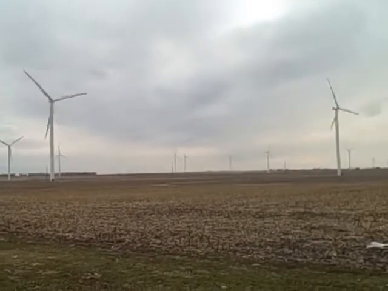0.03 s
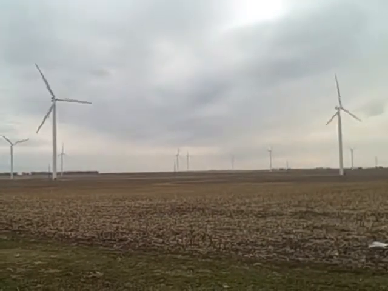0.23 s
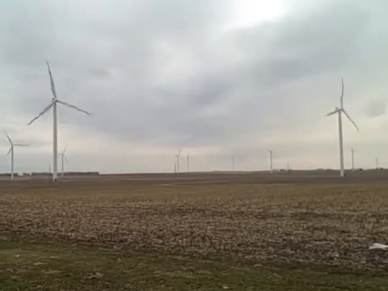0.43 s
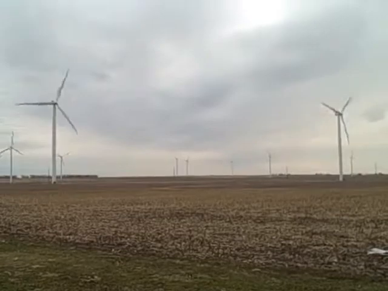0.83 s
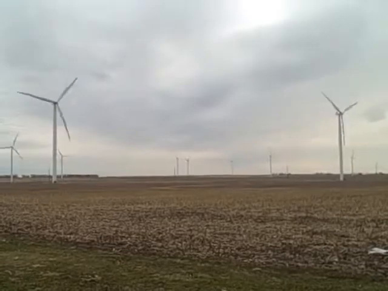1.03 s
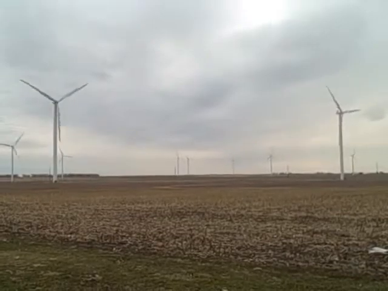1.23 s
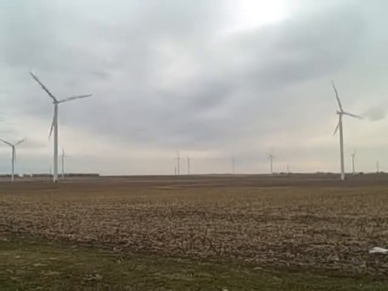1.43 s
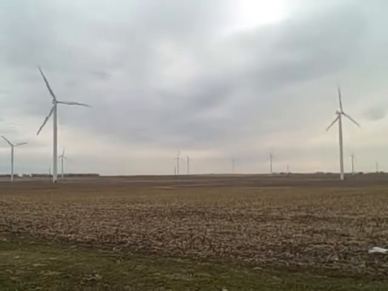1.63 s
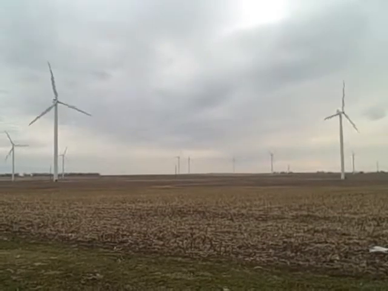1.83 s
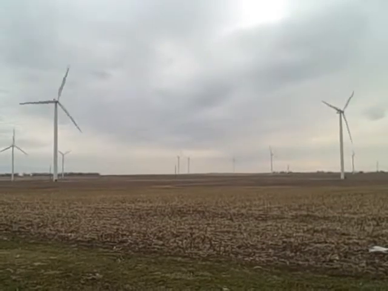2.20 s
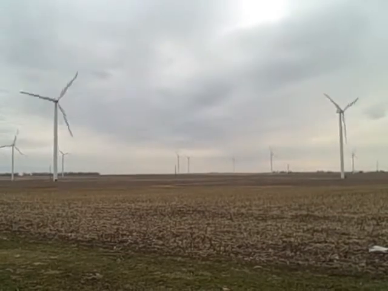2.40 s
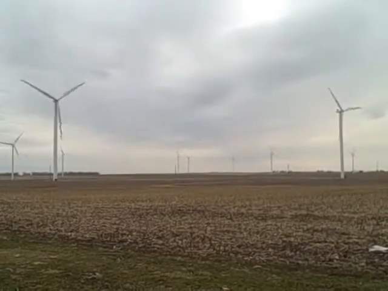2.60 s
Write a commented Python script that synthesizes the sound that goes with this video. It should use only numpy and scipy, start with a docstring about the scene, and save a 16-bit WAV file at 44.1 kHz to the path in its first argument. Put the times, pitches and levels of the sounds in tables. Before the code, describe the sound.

Gusty wind hits the microphone outdoors near wind turbines, thumping and rasping hard at first. It then settles into a quieter low rumble with light thumps, a faint far rush and a weak machine hum behind it.

```python
"""An open field with wind turbines, where gusty wind blows on a small microphone.
Eddies (little swirls of air) hit the microphone's opening as short low thumps. The hardest
break into a fluttering rasp, and a faint whistle from an edge rides the main gust.
The wind then settles to a low rumble over the far rush of the field and a weak machine hum."""
import sys
import numpy as np
from scipy import signal
from scipy.fft import rfft, irfft, next_fast_len
from scipy.io import wavfile
from scipy.ndimage import uniform_filter1d

SR = 44100
rng = np.random.default_rng(int(sys.argv[2]) if len(sys.argv) > 2 else 0)


def digitize_waveform(pressure):
    """Quantize a signal to 16-bit integers and store it at the path in sys.argv[1].

    Rows of a 2-D input are taken as channels; values are limited to [-1, 1].
    """
    field = np.atleast_2d(pressure).T
    bounded = np.clip(field, -1, 1)
    quanta = np.round(bounded * 32767).astype(np.int16)
    wavfile.write(sys.argv[1], SR, quanta)


N = 121275

# How hard the wind presses between hits. Each row: time in seconds, rumble level in dB.
WIND_PRESSURE = [(0, -34), (.05, -39.5), (.17, -39.5), (.28, -28.5), (.45, -30.5), (.62, -30.5),
                 (.8, -28.5), (.87, -30), (1.06, -43.5), (1.17, -38), (1.35, -39), (1.58, -44.5),
                 (1.72, -39.5), (1.82, -39), (1.88, -42.5), (2.1, -41), (2.2, -39.5), (2.36, -50),
                 (2.5, -46), (2.75, -49)]
# Eddies that hit the opening. Each row: time of the peak in seconds, length in seconds,
# then the strengths of its thump, its rasp and its puff in dB.
EDDY_HITS = [(0.093, 0.026, -30.5, -82, -80), (0.206, 0.017, -23.5, -43, -54.5),
             (0.244, 0.016, -26, -37.5, -68), (0.276, 0.021, -17, -37.5, -64.5),
             (0.292, 0.015, -13.5, -27, -43), (0.305, 0.012, -18, -26.5, -39.5),
             (0.321, 0.0094, -18.5, -26, -55), (0.347, 0.014, -10, -33.5, -41),
             (0.356, 0.014, -8, -15.5, -31), (0.374, 0.014, -12, -25, -36), (0.408, 0.03, -15, -35, -58),
             (0.412, 0.0078, -11.5, -45.5, -51.5), (0.473, 0.038, -21.5, -44, -68.5),
             (0.528, 0.024, -19, -40, -55), (0.573, 0.021, -17, -35, -54),
             (0.649, 0.013, -10.5, -31, -44.5), (0.717, 0.026, -22, -31.5, -52),
             (0.74, 0.013, -20, -24, -41), (0.754, 0.018, -15.5, -37, -50),
             (0.787, 0.0087, -18.5, -40.5, -57), (0.816, 0.016, -12.5, -29.5, -58.5),
             (0.894, 0.013, -19.5, -32, -51), (0.914, 0.014, -27.5, -40.5, -50),
             (0.983, 0.028, -21, -48.5, -64), (1.022, 0.019, -23.5, -58.5, -73),
             (1.074, 0.021, -27.5, -52.5, -74), (1.097, 0.018, -24, -52.5, -51.5),
             (1.114, 0.02, -30, -46.5, -58), (1.242, 0.03, -28.5, -56.5, -75),
             (1.26, 0.012, -48, -62, -52.5), (1.955, 0.019, -27, -66, -52.5),
             (1.974, 0.014, -26, -52.5, -52), (2.025, 0.02, -27, -57.5, -84),
             (2.046, 0.0071, -25, -50, -72), (2.073, 0.022, -23, -52, -64), (2.089, 0.019, -30, -54, -52),
             (2.116, 0.038, -29, -51.5, -74), (2.44, 0.031, -22.5, -65.5, -75),
             (2.471, 0.036, -25, -50.5, -74), (2.497, 0.009, -35, -54, -54),
             (2.512, 0.011, -27.5, -44.5, -49), (2.529, 0.016, -26.5, -52.5, -67.5),
             (2.554, 0.037, -30, -52, -66), (2.609, 0.015, -33, -79, -79.5)]
# The tone colours of four noises. Each row: frequency in Hz, relative strength there in dB.
RUMBLE_COLOUR = [(10, -13.5), (22, 1), (45, 2), (75, -10), (130, -13), (200, -24), (320, -34), (600, -51.5),
                 (1500, -74)]
RUSH_COLOUR = [(40, 14), (200, -4.5), (400, -2), (800, 0.5), (1200, -0.5), (1700, -5.5), (2400, -19),
               (3300, -26), (4400, -31), (5400, -28.5), (6200, -35), (7300, -42), (8500, -57)]
THUMP_COLOUR = [(12, -21.5), (28, -4), (55, 1.5), (110, -0.5), (170, -7), (245, -13.5), (330, -28),
                (600, -51.5), (1500, -91.5)]
RASP_COLOUR = [(100, -17.5), (230, 6), (335, -0.5), (450, 1.5), (630, -0.5), (850, -14), (1250, -37),
               (1800, -42), (2600, -49.5), (5000, -63)]
# The far rush of the field. Each row: time in seconds, level in dB before the treble boost.
RUSH_LEVEL = [(0, -64.5), (.15, -58.5), (.6, -55), (1.1, -57.5), (1.5, -55.5), (2.0, -54), (2.4, -53.5),
              (2.75, -55)]
# The treble heard in the background. Each row: time in seconds, boost in dB (below zero is a cut).
BACKGROUND_TREBLE = [(0, 15), (.2, 3.5), (.45, -2), (.95, 1), (1.15, 4), (2.75, 2)]
# Air whistling at an edge. Each row: time in seconds, pitch in Hz, level in dB.
EDGE_WHISTLE = [(.38, 1667, -105), (.53, 1645, -65.5), (.66, 1720, -62.5), (.77, 1770, -62),
                (.88, 1798, -63.5), (1.0, 1766, -77.5), (1.15, 1776, -105)]


def undb(db):
    """Turn decibels into a number to multiply by."""
    return 10 ** (np.asarray(db) / 20)


def unit(x):
    """Scale a signal so its average size (rms) is 1."""
    return x / np.sqrt(np.mean(x ** 2))


def curve(table, column=1):
    """One column of a table, joined by straight lines in time."""
    rows = np.array(table)
    return np.interp(np.arange(N) / SR, rows[:, 0], rows[:, column])


def noise(gain):
    """Noise of size 1, with its frequencies weighted by gain(Hz)."""
    size = next_fast_len(N)
    hz = np.maximum(np.arange(size // 2 + 1) * SR / size, 1)
    spectrum = rfft(rng.standard_normal(size)) * gain(hz)
    return unit(irfft(spectrum, size)[:N])


def coloured(colour):
    """Noise that follows a colour table and falls away above its last row."""
    hz, db = np.array(colour).T
    return noise(lambda f: undb(np.interp(np.log(f), np.log(hz), db)) / np.maximum(f / hz[-1], 1) ** 2)


def band(centre_hz, width_hz):
    """Noise around one frequency. Centred on 0, it is a random wobble."""
    return noise(lambda f: 1 / (1 + ((f - centre_hz) / width_hz) ** 2) ** 2)


def eddies(colour, window_s=0.019, evenness=0.66):
    """Random swings of air pressure, evened out so each thump and rasp has a reliable strength."""
    swings = coloured(colour)
    power = uniform_filter1d(np.abs(signal.hilbert(swings)) ** 2, int(window_s * SR))
    return unit(swings / (power + 1e-9) ** (evenness / 2))


def hit_powers(wind_db):
    """Each eddy that hits gives a brief swell of power to the thump, the rasp and the puff."""
    t = np.arange(N) / SR
    thump, puff = np.zeros(N), np.zeros(N)
    strong_wind_db = -31.5
    rasp = undb(-50.5 + 3.1 * (wind_db - strong_wind_db)) ** 2  # strong wind rasps between hits too
    for peak_s, length_s, thump_db, rasp_db, puff_db in EDDY_HITS:
        swell = np.exp(-(2 * (t - peak_s) / length_s) ** 2)
        thump += swell * undb(thump_db) ** 2
        rasp += swell * undb(rasp_db) ** 2
        puff += swell * undb(puff_db) ** 2
    return thump, rasp, puff


def wind_rumble(wind_db, wander_db=1.5):
    """Wind pressing on the microphone makes a low rumble that swells and sags by chance."""
    return undb(wind_db + wander_db * band(0, width_hz=43)) * eddies(RUMBLE_COLOUR)


def field_rush(wander_db=0.7):
    """Far wind and turbine blades make a steady rush."""
    return coloured(RUSH_COLOUR) * undb(curve(RUSH_LEVEL) + wander_db * band(0, width_hz=14))


def treble_dip(sound, treble_hz=1950):
    """The background treble dips during the main gust."""
    body = signal.sosfiltfilt(signal.butter(4, treble_hz, fs=SR, output="sos"), sound)
    return body + undb(curve(BACKGROUND_TREBLE)) * (sound - body)


def machine_hum(level_db=-55.5):
    """Machinery hums weakly on one low note."""
    return undb(level_db) * band(125.5, width_hz=8)


def air_hiss(puff_gain):
    """Air in the opening makes a trace of thin hiss, which grows more gently than the puffs."""
    return undb(-57) * puff_gain ** 0.46 * band(6920, width_hz=1000)


def eddy_thumps(thump_power, rasp_power, dull_hz=113, trim_db=-1.5):
    """Eddies thump on the opening. Those too smooth to rasp give a duller thump."""
    bright = eddies(THUMP_COLOUR)
    dull = unit(signal.sosfiltfilt(signal.butter(2, dull_hz, fs=SR, output="sos"), bright))
    rasp_db = 10 * np.log10(rasp_power)
    bright_share = .5 + .5 * np.tanh((rasp_db + 53) / 10.5)  # half and half at -53 dB
    swings = bright_share * bright + (1 - bright_share) * dull
    return undb(trim_db) * np.sqrt(thump_power) * swings


def fluttering_rasp(power, flutter_limit_db=12):
    """The hardest eddies break up into a rasp that comes in quick spurts."""
    flutter = np.tanh(band(0, width_hz=153) / 2)
    spurts = unit(undb(flutter_limit_db * flutter))
    return np.sqrt(power) * spurts * eddies(RASP_COLOUR)


def papery_puffs(gain):
    """An eddy that hits the opening squarely makes a papery puff."""
    return gain * band(880, width_hz=482)


def edge_whistle(waver_hz=24.4, width_hz=30):
    """Air passing an edge makes a breathy note that wavers and rises a little with the gust."""
    pitch_hz = curve(EDGE_WHISTLE) + waver_hz * band(0, width_hz=15)
    phase = 2 * np.pi * np.cumsum(pitch_hz) / SR
    tone = band(0, width_hz) * np.cos(phase) + band(0, width_hz) * np.sin(phase)
    return unit(tone) * undb(curve(EDGE_WHISTLE, column=2))


def scene():
    """Add the wind on the microphone and the sounds of the field into one channel."""
    wind_db = curve(WIND_PRESSURE)
    thump_power, rasp_power, puff_power = hit_powers(wind_db)
    puff_gain = np.sqrt(puff_power + undb(wind_db - 25) ** 2)  # a little papery noise stays between hits
    background = wind_rumble(wind_db) + treble_dip(field_rush()) + machine_hum() + air_hiss(puff_gain)
    hits = eddy_thumps(thump_power, rasp_power) + fluttering_rasp(rasp_power) + papery_puffs(puff_gain)
    return (background + hits + edge_whistle())[None, :]


def record(dry, ceiling=0.62, top_hz=8500):
    """The microphone rounds off the biggest swings, and the recorder cuts the highest treble."""
    rounded = dry / (1 + (dry / ceiling) ** 4) ** .25
    return signal.sosfilt(signal.ellip(8, .2, 70, top_hz, fs=SR, output="sos"), rounded)


dry = scene()
out = record(dry)
digitize_waveform(out)
```